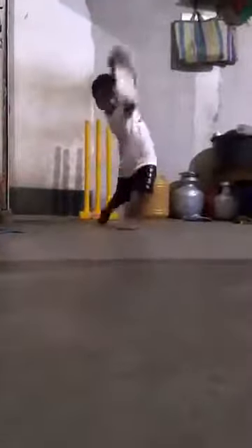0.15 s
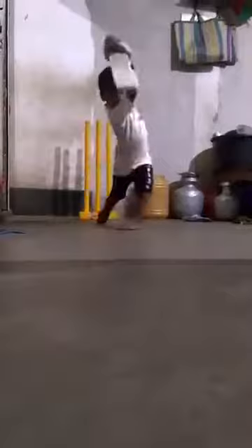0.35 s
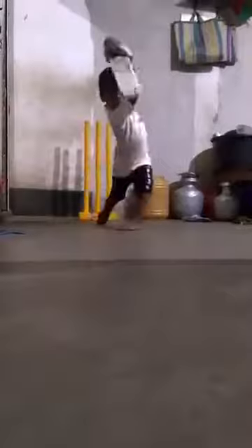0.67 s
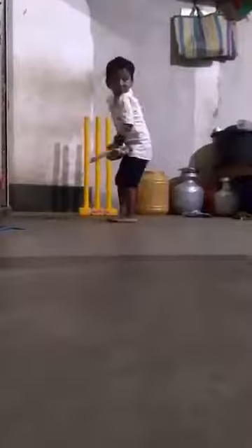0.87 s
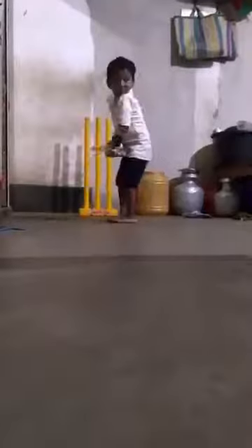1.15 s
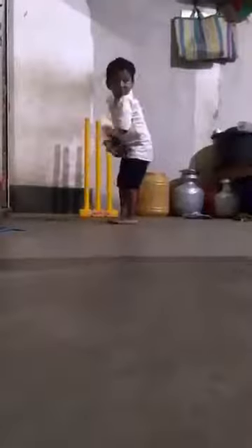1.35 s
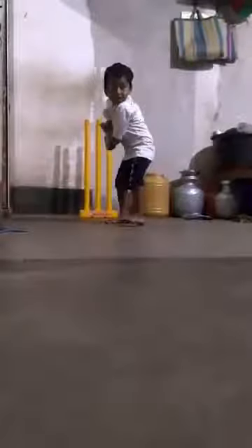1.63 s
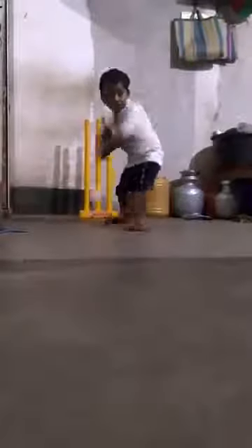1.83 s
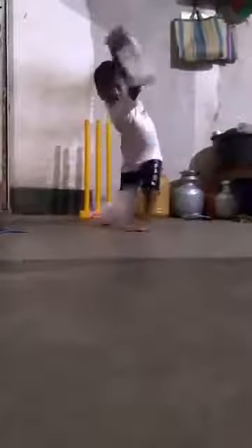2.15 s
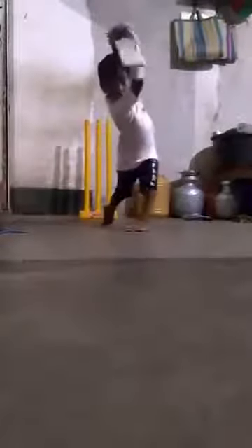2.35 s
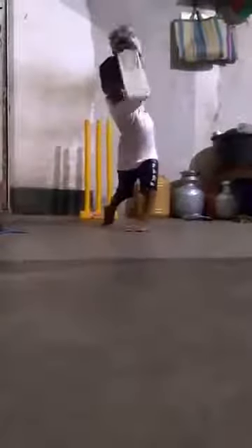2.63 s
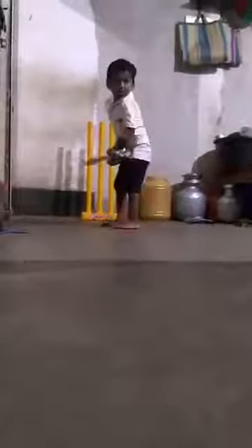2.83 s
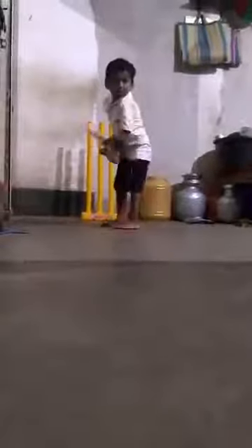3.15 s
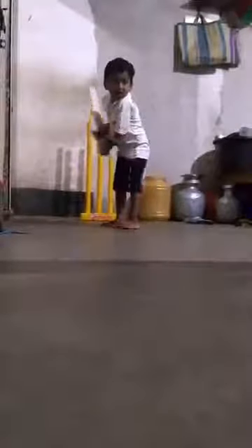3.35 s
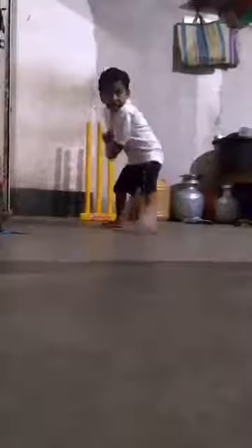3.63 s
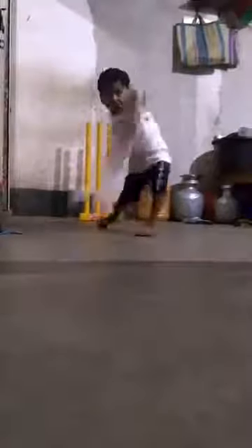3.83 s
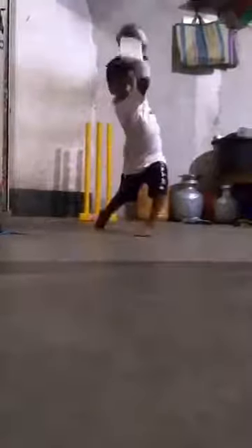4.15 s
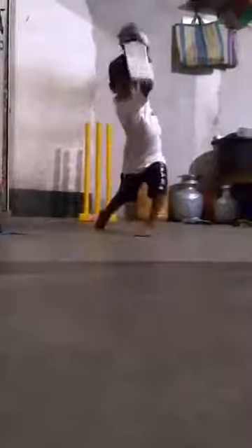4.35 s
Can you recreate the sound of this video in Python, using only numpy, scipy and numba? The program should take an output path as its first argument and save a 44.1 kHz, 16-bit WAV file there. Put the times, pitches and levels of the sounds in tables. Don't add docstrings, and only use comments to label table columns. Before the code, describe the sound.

Sharp hollow clacks of plastic bat on ball, each followed by a booming wall slam and clattering bounces in a hard, reverberant room.

```python
import sys
import numpy as np
from scipy import signal
from scipy.fft import rfft, irfft
from scipy.io import wavfile
from scipy.ndimage import uniform_filter1d
from numba import njit

SR = 44100
rng = np.random.default_rng(int(sys.argv[2]) if len(sys.argv) > 2 else 0)


def rack_gain(trim_db):
    fader = np.asarray(trim_db, float)
    return 10 ** (fader / 20)


def dump_mix(stems):
    frames = np.atleast_2d(stems).T
    limited = np.clip(frames, -1, 1)
    pcm = np.round(limited * 32767).astype(np.int16)
    wavfile.write(sys.argv[1], SR, pcm)


N = 197726
TAIL = 1 << 16
HZ = np.arange(TAIL // 2 + 1) * SR / TAIL
CHANGE_S = 2.965


def during(table, first):
    return [row for row in table if (row[0] < CHANGE_S) == first]


def shot(first):
    return strikes(first) + slams(first) + rebounds(first) + near_bounces(first) + far_bounces(first)


# t/s, level/dB, ring of the three lowest shell modes level/dB (three columns)
STRIKES = [
    (0.237, -6.5, -5.5, -2, 2),
    (2.152, -7.5, 7, -8.5, 4),
    (2.8851, -4.5, -8, 2.5, -5),
    (4.055, -7, -9.5, -3.5, 2),
]
STRIKE_ECHOES = [8.5, -33, -2, 1.5]
# f/Hz, level/dB
BAT_COLOUR = [(60, -40), (160, -21.5), (290, -20.5), (520, -12.5), (1250, -0.5), (2050, -2), (3000, -17),
              (12000, -17.5)]


def strikes(first):
    rows = during(STRIKES, first)
    echo_dbs = [db for row, db in zip(STRIKES, STRIKE_ECHOES) if row in rows]
    gains = []
    for row in rows:
        bat = clumps() ** 0.77 * colour(BAT_COLOUR)
        gains.append(np.hypot(bat, rack_gain(-7) * shell(row)))
    return blows(rows, gains, echo_dbs, direct_db=13, gain_db=-5, crack_db=9, build_s=.009, sparse_db=2.2)


# t/s, level/dB, panel ring f/Hz, ring level/dB, brightness/(dB per octave)
SLAMS = [
    (.365, -11.5, 1055, 4.5, 0.14),
    (2.328, -1.5, 762, 10.5, 1),
    (4.190, 0, 756, 5.5, 1),
]


def slams(first):
    rows = during(SLAMS, first)
    gains = [nulls() * clumps() * panel(row) for row in rows]
    return blows(rows, gains, [-9] * len(rows), direct_db=8, gain_db=4, crack_db=3, build_s=.003, sparse_db=1.5)


# t/s, level/dB, panel ring f/Hz, ring level/dB, brightness/(dB per octave)
REBOUNDS = [
    (2.418, 8.6, 1065, -7, -0.3),
    (4.338, 0.25, 288, 10.5, -2.2),
]


def rebounds(first):
    rows = during(REBOUNDS, first)
    gains = [nulls() * clumps() * panel(row) for row in rows]
    return blows(rows, gains, [-6] * len(rows), direct_db=4.5, gain_db=4, crack_db=-3, build_s=.012, sparse_db=1.6)


# t/s, level/dB, ring of the three lowest shell modes level/dB (three columns)
NEAR_BOUNCES = [
    (.447, -15, 1.8, -22, 5.4),
]
# f/Hz, level/dB
NEAR_SLAB = [(60, -34.5), (370, -11.5), (900, -9), (2000, -3), (3200, -19), (6200, -17.5), (9250, -19.5),
             (12100, -15.5)]


def near_bounces(first):
    rows = during(NEAR_BOUNCES, first)
    gains = [nulls() * np.hypot(colour(NEAR_SLAB), rack_gain(-9.0) * shell(row)) for row in rows]
    return blows(rows, gains, [-9] * len(rows), direct_db=12, gain_db=6, crack_db=1.5, build_s=.006, sparse_db=1.5)


# t/s, level/dB, ring of the three lowest shell modes level/dB (three columns)
FAR_BOUNCES = [
    (2.4944, -0.5, -18, -7.5, -15),
    (2.7368, -48, -6, -1, -25),
    (4.2941, -10, -20, -16, 1.5),
]
# f/Hz, level/dB
FAR_SLAB = [(60, -35), (224, -11), (1500, 0.5), (6730, -20.5), (7890, -29), (8450, -23), (10400, -24),
            (12100, -26)]


def far_bounces(first):
    rows = during(FAR_BOUNCES, first)
    gains = [nulls() * np.hypot(colour(FAR_SLAB), rack_gain(-9.0) * shell(row)) for row in rows]
    return blows(rows, gains, [-9] * len(rows), direct_db=10.5, gain_db=6, crack_db=4, build_s=.006, sparse_db=1.5)


# f/Hz, width/Hz, level/dB
SHELL = [(4837, 180, 5), (5620, 200, 6.5), (6200, 410, 4.5), (7100, 180, -13), (9930, 540, -7.5)]


def shell(row):
    lows = [(f, width, db + more_db) for (f, width, db), more_db in zip(SHELL, row[2:])]
    return rack_gain(-2.0) * modes(lows + SHELL[3:])


# f/Hz, level/dB
WALL_COLOUR = [(60, -48), (130, -20), (420, -8.5), (1250, -7), (1600, -10), (3600, -23.5), (7900, -32.5),
               (11800, -31.5)]


def panel(row):
    *_, ring_hz, ring_db, tilt_db = row
    tilt = rack_gain(tilt_db * np.log2(HZ / 1500 + .01))
    panel_ring = modes([(ring_hz, 0.14 * ring_hz, ring_db)])
    return colour(WALL_COLOUR) * tilt * np.hypot(1, panel_ring)


# f/Hz, width/Hz, depth 0-1
NULLS = [(8160, 220, 0.6), (9360, 250, 1), (11500, 170, 1)]


def nulls():
    return np.prod([1 - min(depth, .995) * np.exp(-((HZ - f) / width) ** 4) for f, width, depth in NULLS], axis=0)


def clumps():
    size = int(75.5 * TAIL / SR)
    rough = uniform_filter1d(uniform_filter1d(rng.standard_normal(len(HZ)), size=size), size=size)
    return rack_gain(3.5 * rough / rough.std())


# t/s, level/dB
TAPS = [
    (1.068, -15),
    (1.995, -47),
]
# t/s, level/dB
LATER_TAPS = [
    (2.88, -22.5),
]
# f/Hz, level/dB
KNOCK = [(60, -29.5), (214, -20.5), (400, -24), (800, 5), (1080, -19), (1520, -1), (1890, -13),
         (7500, -58.5)]
# f/Hz, width/Hz, level/dB
HOLLOW_BAT = [(218, 22.8, -15), (662, 250, -6), (795, 40, -6.5), (830, 45, -8.5), (901, 17, -2.5),
              (1123, 19, -8.5), (1572, 42.2, -2), (2530, 270, -25.5)]
# f/Hz, width/Hz, level/dB
HOLLOW_BAT_LATER = [(211, 44, -12.5), (404, 30, -11), (603, 54, -3.5), (816, 28, 3), (795, 23, -8),
                    (1004, 30, -8), (1253, 27, -9), (1422, 25, -9)]


def taps(table, hollow, ring_db):
    gain = np.hypot(colour(KNOCK), rack_gain(ring_db) * modes(hollow))
    gain = gain / (1 + (HZ / 6500) ** 6.3)
    return blows(table, [gain] * len(table), [-12] * len(table),
                 direct_db=13.7, gain_db=-1, crack_db=4.1, build_s=0.0022, sparse_db=0.24)


# f/Hz, level under the blow/dB, t60/s
BAT_RING = [(835, -19.5, 0.64), (910, -18.5, 1.0), (1578, -9.5, 0.47)]
# f/Hz, level under the blow/dB, t60/s
BAT_RING_LATER = [(790, -8.5, 0.73), (843, -13, 1.4), (1456, 0, 0.62)]


def ring(table, lines):
    out, t = np.zeros(N + TAIL), np.arange(TAIL) / SR
    for s, db in table:
        start = int(s * SR)
        for hz, line_db, t60 in lines:
            turn = uniform_filter1d(np.repeat(rng.standard_normal(TAIL // 1024), 1024), size=1024)
            fade = rack_gain(db + line_db - 60 * t / t60 + 2.0 * turn)
            out[start:start + TAIL] += fade * np.sin(2 * np.pi * hz * t)
    return out[:N]


# t/s, level/dB, upper edge f/Hz, length/s
THUDS = [
    (.237, -42, 265, 0.0039),
    (.365, -49, 152.4, 0.013),
    (.448, -36, 150, 0.012),
    (2.151, -32.5, 403, 0.0016),
    (2.328, -43.5, 189.5, 0.017),
    (4.054, -26, 410, 0.0083),
]


def thuds():
    out, t = np.zeros(N + 4000), np.arange(4000) / SR
    for s, db, top_hz, length_s in THUDS:
        band = signal.butter(2, [90, top_hz], "band", fs=SR, output="sos")
        burst = signal.sosfilt(band, rng.standard_normal(len(t)) * np.exp(-t / length_s))
        start = int(s * SR)
        out[start:start + len(t)] += rack_gain(db) * burst / np.abs(burst).max() * np.exp(1)
    return out[:N]


# f/Hz, level/dB
CRACK = [(300, -21), (1500, 4), (4000, -14), (10000, -31.5), (14000, -14)]


def blows(table, gains, echo_dbs, direct_db, gain_db, crack_db, build_s, sparse_db):
    out, t = np.zeros(N + TAIL), np.arange(400) / SR
    direct = rack_gain(direct_db)
    for (s, db, *_), gain, echo_db in zip(table, gains, echo_dbs):
        gain = gain / np.sqrt(np.mean(gain ** 2))
        chatter = rng.standard_normal(len(t)) * (t / 0.00077) * np.exp(-(t / 0.0012) ** 2)
        click_body = causal(np.hypot(colour(CRACK), 0.43 * gain))
        click = rack_gain(crack_db - 6.5) * click_body * rfft(chatter, TAIL)
        body = causal(gain) * (direct + room(build_s, sparse_db, direct_db + echo_db))
        start = int(s * SR)
        out[start:start + TAIL] += rack_gain(db + gain_db) * irfft(direct * click + body)
    return out[:N]


def colour(table, hz=HZ):
    f, db = np.transpose(table)
    bass_edge = np.minimum(1, (hz + 1) / f[0]) ** 5.
    treble_edge = np.sqrt(1 + (hz / 12200) ** (2 * 36))
    return rack_gain(np.interp(np.log(hz + 1), np.log(f), db)) * (bass_edge / treble_edge)


def modes(table):
    power = 0
    for f, width, db in table:
        detune = (HZ - f * f / (HZ + 1)) / width
        power = power + rack_gain(2 * db) / (1 + detune ** 2) ** 1.56
    return np.sqrt(power)


def causal(gain):
    cepstrum = irfft(np.log(gain + 1e-6))
    cepstrum[1:TAIL // 2] *= 2
    cepstrum[TAIL // 2 + 1:] = 0
    return np.exp(rfft(cepstrum))


# f/Hz, t60/s
DECAY = [(100, 0.84), (300, 1), (1000, 0.9), (2000, 0.83), (3500, 0.7), (6000, 0.59), (12200, 0.48),
         (13300, .2)]
# delay t/s, level/dB
ECHOES = [(.013, 0), (.0195, -2), (.0295, -1), (.045, -6)]


def room(build_s, sparse_db, echo_db):
    t = np.arange(TAIL) / SR
    noise, lumps = rng.standard_normal(TAIL), rng.exponential(size=TAIL // 64)
    patchy = rack_gain(sparse_db * np.exp(-t / 0.084) * (np.repeat(lumps, 64) - 4.5))
    reflections = noise * patchy * (1 - np.exp(-t / build_s))
    hz, s, bands = signal.stft(reflections, SR, nperseg=256)
    f, t60 = np.transpose(DECAY)
    band_t60 = np.interp(np.log(hz + 1), np.log(f), t60)
    bands = bands * rack_gain(-60 * s / band_t60[:, None])
    tail = signal.istft(bands, SR, nperseg=256)[1][:TAIL]
    echoes = np.zeros(TAIL)
    for late, db in ECHOES:
        echoes[int(late * SR)] = rack_gain(echo_db + db)
    dull = 1 / (1 + 1j * HZ / 3000)
    return rfft(tail) + rfft(echoes) * dull


# f/Hz, level/dB
HUM_COLOUR = [(20, -49), (90, -28), (115, -7.5), (253, -12), (754, -11), (1200, -11), (3200, -26),
              (11200, -54)]


def hum():
    hz = np.arange(N // 2 + 1) * SR / N
    low = 1 / (1 + (hz / 600) ** 2)
    out = 0
    for share in (low, 1 - low):
        waver = uniform_filter1d(np.repeat(rng.standard_normal(N // 4000 + 1), 4000)[:N], size=4000)
        noise = rfft(rng.standard_normal(N)) * colour(HUM_COLOUR, hz) * np.sqrt(share)
        out = out + rack_gain(0.31 * waver) * irfft(noise, N)
    return out * rack_gain(-49) / np.std(out)


@njit
def follow(x, attack, release):
    level, out = 0., np.empty(len(x))
    for i in range(len(x)):
        level += (abs(x[i]) - level) * (attack if abs(x[i]) > level else release)
        out[i] = level
    return out


def gain_control(x):
    top, ratio, attack_s, release_s = rack_gain(-8.5), 6., .0008, .25
    ahead = np.append(x[30:], x[:30])
    level = follow(ahead, 1 / (attack_s * SR), 1 / (release_s * SR))
    return x * np.minimum(1, top / (level + 1e-9)) ** (1 - 1 / ratio)


def scene():
    t = np.arange(N) / SR
    after = np.clip((t - CHANGE_S) / 0.025 + .5, 0, 1)
    ring_drop = rack_gain(-3.5 * np.clip((t - 3.128) / 0.01, 0, 1))
    house = hum()
    early_taps = taps(TAPS, HOLLOW_BAT, 11.6) + ring(TAPS, BAT_RING)
    before = gain_control(shot(True) + early_taps + rack_gain(0.8) * house)
    later_taps = taps(LATER_TAPS, HOLLOW_BAT_LATER, 9.3) + ring(LATER_TAPS, BAT_RING_LATER)
    later = gain_control(shot(False) + ring_drop * later_taps + house)
    return (before * (1 - after) + later * after + thuds())[None]


def roll_off(x):
    return signal.sosfilt(signal.butter(12, 13760, fs=SR, output="sos"), x)


def record(dry):
    ceiling = .75
    rounded = ceiling * np.tanh(dry / ceiling)
    top_cut = signal.ellip(8, .2, 60, 13600, fs=SR, output="sos")
    return roll_off(signal.sosfilt(top_cut, rounded))


dry = scene()
out = record(dry)
dump_mix(out)
```